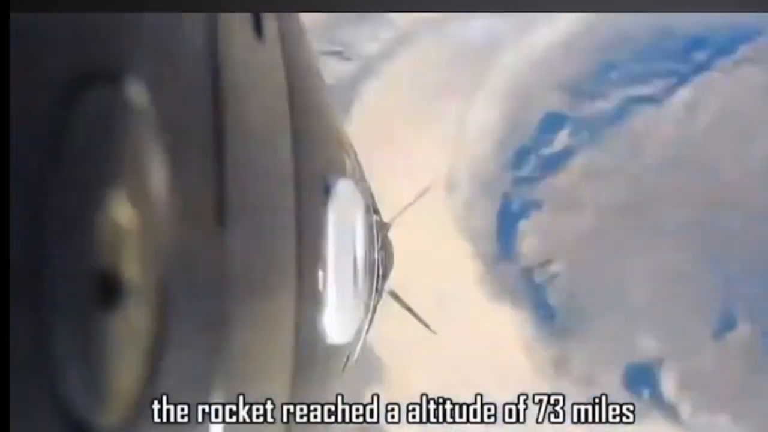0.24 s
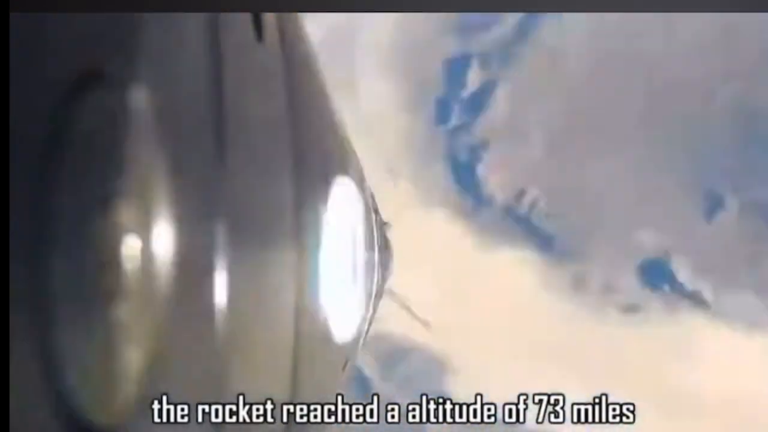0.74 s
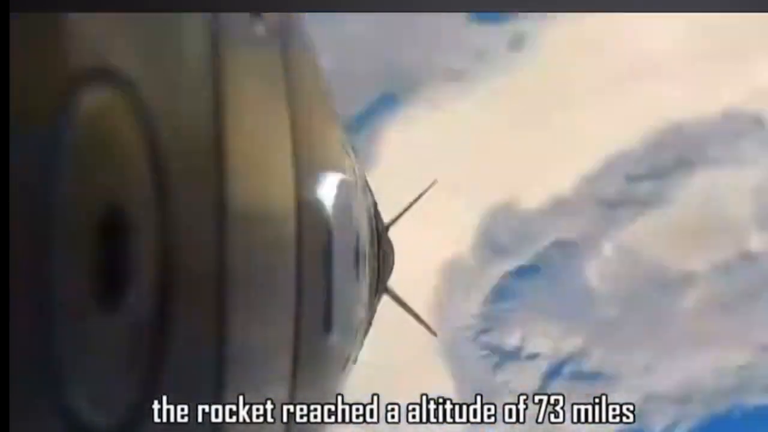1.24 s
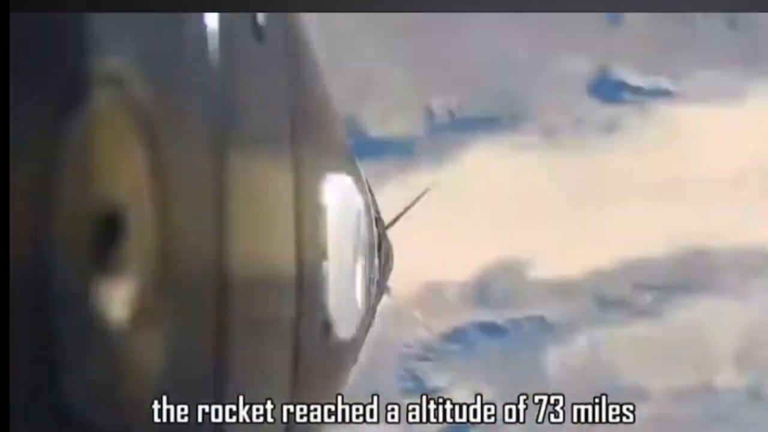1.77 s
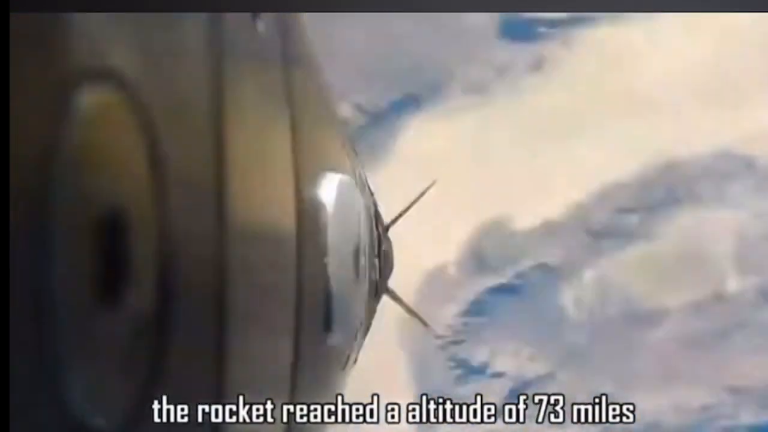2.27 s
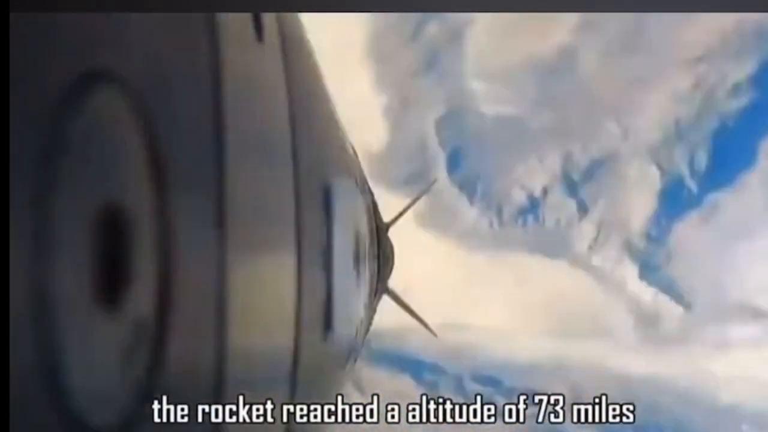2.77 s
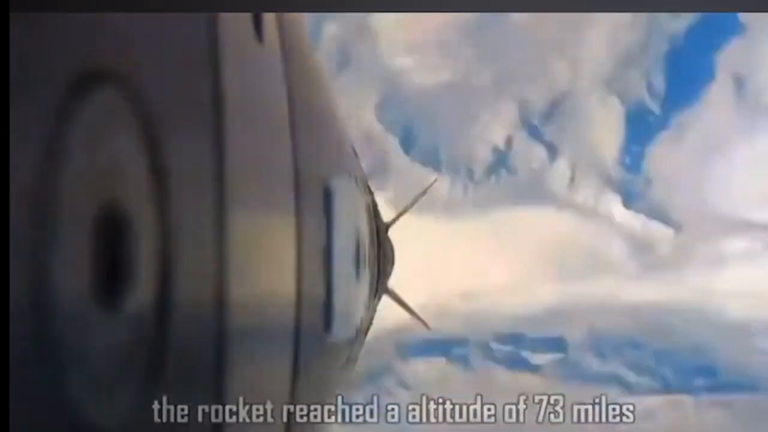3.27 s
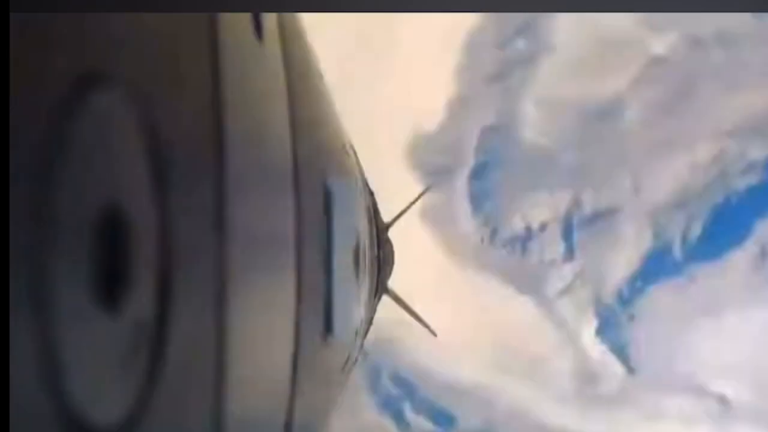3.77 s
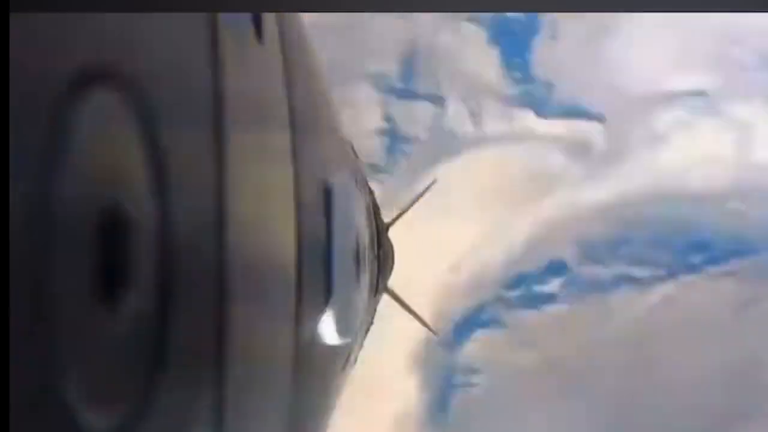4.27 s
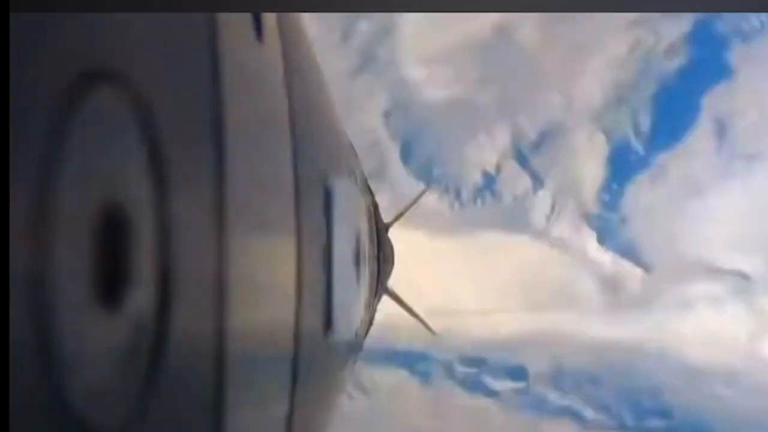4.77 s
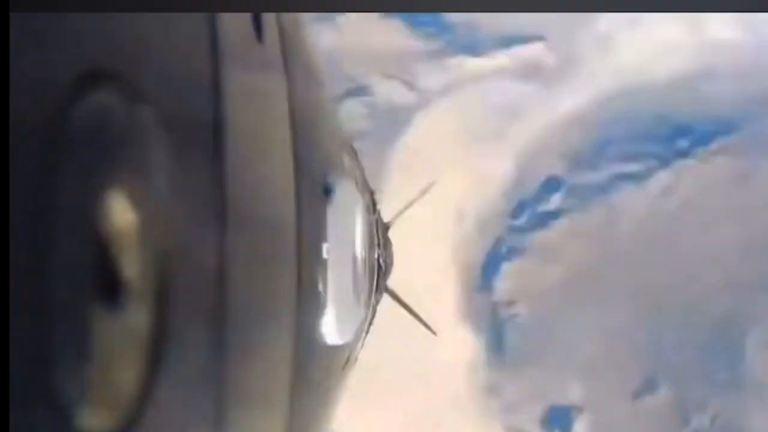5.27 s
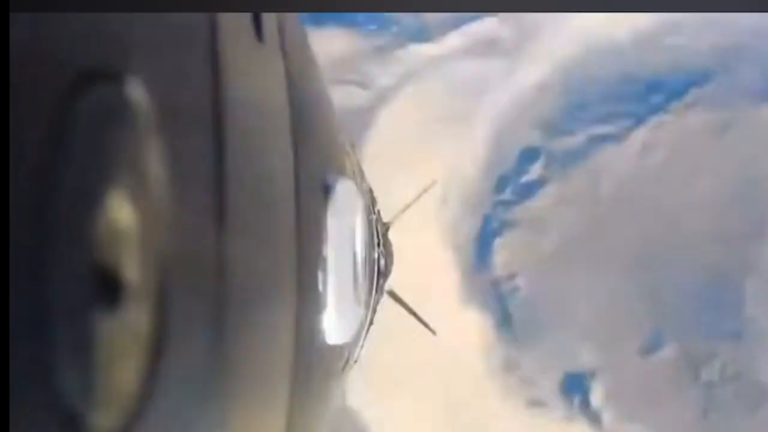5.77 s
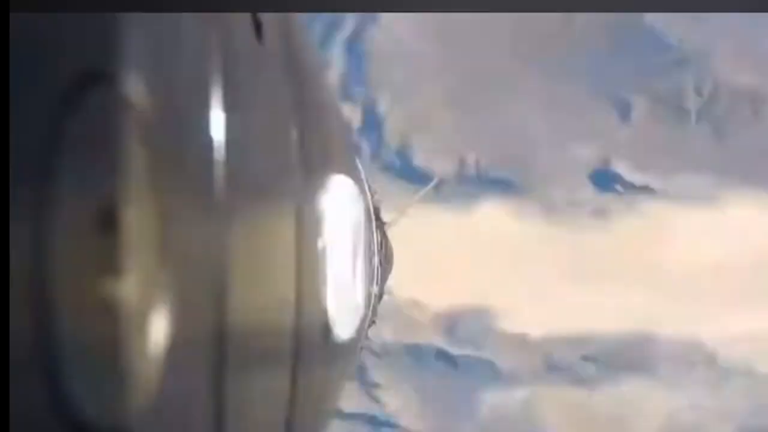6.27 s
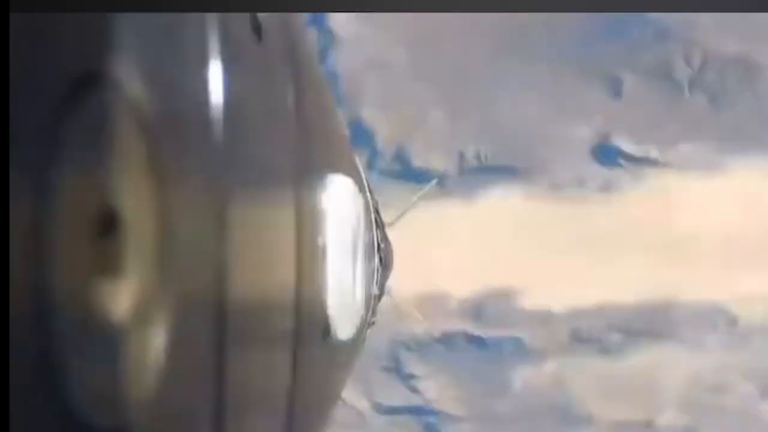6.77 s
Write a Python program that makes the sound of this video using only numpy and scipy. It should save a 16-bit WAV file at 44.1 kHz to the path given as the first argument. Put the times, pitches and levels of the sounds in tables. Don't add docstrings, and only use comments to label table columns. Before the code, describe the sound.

A camera fixed to a spinning rocket picks up vibration through the metal body: a steady, hollow, mid-low roar with dense fluttering knocks, a resonant plastic-like rush and thin hiss. Deep pressure rumble swells around three seconds. Everything gradually weakens as the air thins. Near the end a latch snaps twice in very quick succession, with a small thump and crack. Close, dry, crude sound with gritty mirrored treble and no echo.

```python
import sys
import numpy as np
from scipy import signal
from scipy.fft import rfft, irfft
from scipy.io import wavfile
from scipy.ndimage import uniform_filter1d

SR = 44100
rng = np.random.default_rng(int(sys.argv[2]) if len(sys.argv) > 2 else 0)


def volts_from_decibels(level):
    exponent = np.asarray(level, float) / 20
    return 10 ** exponent


def waveform_to_disk(signal):
    frames = np.transpose(np.atleast_2d(signal))
    scaled = np.clip(frames, -1, 1) * 32767
    samples = np.round(scaled).astype(np.int16)
    wavfile.write(sys.argv[1], SR, samples)


N = 310023

# f/Hz, width/Hz, level/dB
HULL_MODES = [(146.7, 17, -14), (168.8, 12, -16), (194.3, 28, -17), (248.8, 14.8, -6), (287.2, 19.2, -1.5),
              (315.7, 34, -5), (355.9, 16.2, -1.5), (395, 22, -5.5)]
# f/Hz, width/Hz, level/dB
PANEL_MODES = [(484, 56, -11.5), (505.2, 43, -5.5), (554, 62, -16), (588, 26, -12.5), (643.7, 51.6, -5),
               (689.5, 9.2, -3), (746, 79, -10.5), (842, 102, -20.5)]
# f/Hz, width/Hz, level/dB
HOUSING_MODES = [(1189, 98, -5.5), (1528, 63, -10), (1838, 66, -5), (1933, 146, -7), (2068, 91, -4.5),
                 (2233, 89, 0.5), (2544, 180, -5), (3075, 350, -11), (3180, 220, -25.5)]
# f/Hz, width/Hz, level/dB
SKIN_MODES = [(3015, 290, -3.5), (3290, 196, -4.5), (3816, 160, -4), (4153, 243, -0.5), (4380, 460, -4),
              (5310, 475, -1.5)]
# t/s, level over hull roar/dB, f/Hz
STRONG_GUSTS = [(0.026, 16, 315), (0.234, 19.5, 322), (0.3, 19.5, 350), (0.466, 14.5, 310),
                (0.561, 17.5, 353), (0.65, 17.5, 328), (0.784, 15.5, 340), (0.868, 22.5, 350),
                (1.037, 19.5, 339), (1.074, 21.5, 380), (1.193, 19.5, 306), (1.502, 16.5, 310),
                (1.55, 20, 344), (1.79, 20, 327), (2.093, 22, 347), (2.424, 18.5, 318), (2.694, 18.5, 282),
                (2.996, 15, 360), (3.475, 22.5, 330), (3.61, 18, 367), (3.913, 20, 350), (4.225, 22, 333),
                (4.393, 21.5, 308), (4.463, 13, 307), (4.55, 17.5, 294), (1.356, 18, 365),
                (5.004, 19.5, 280), (5.453, 24, 315), (6.637, 21.5, 306), (6.949, 17.5, 280)]
# t/s, gain/dB, half width/s
PRESSURE_SURGES = [
    (0.5, 1.5, 0.16),
    (1.35, 1.5, .2),
    (2.25, 3.5, 0.18),
    (3.15, 9, 0.2),
    (4.55, 4, 0.25),
    (5.64, 2, 0.11),
    (6.4, -1, 0.34),
]
# t/s, held/s, peak/dB, seating/0-1
LATCH_SNAPS = [
    (6.471, 0.027, -33, 0.03),
    (6.4987, 0.019, -29.5, 0.87),
]
# f/Hz, level/dB, t60 after release/s
LATCH_MODES = [(248, -10, 0.21), (280, 2, .03), (648, -10, .04), (796, -14, 0.0077), (1126, -24.5, 0.053),
               (1230, -22.5, 0.045), (2200, -22, .02)]
# f/Hz, level/dB, t60 before scaling/s
STRUCK_MODES = [(100, -20, 0.14), (166, -13.5, 0.12), (350, -14, 0.025), (383, -9.5, 0.061),
                (480, -11.5, 0.085), (550, -11, 0.024)]
# f/Hz, level/dB
TREBLE_STEP = [(9000, -25), (10100, -12), (10400, -3), (11200, -2.5), (12000, -5.5), (12800, -4),
               (13200, -3.5), (14500, 3)]
# until t/s, ceiling f/Hz
EARLY_CEILINGS = [
    (.7, 14280),
    (1.93, 13500),
]
# t/s, length/s, ceiling f/Hz
CEILING_LIFTS = [(.76, .09, 14300), (.92, .06, 14200), (1.12, .08, 14300), (1.24, .07, 14300),
                 (1.73, .05, 14100), (1.85, .04, 14400), (1.97, .3, 13200), (2.4, .12, 13400),
                 (2.6, .03, 14450), (2.75, .08, 13500), (2.92, .13, 13600), (3.03, .025, 14200),
                 (6.47, .03, 13600)]


def rms_one(x):
    return x / np.sqrt(np.mean(x ** 2) + 1e-20)


def drift(rate_hz):
    r = np.exp(-40 * np.pi * rate_hz / SR)
    coarse = rng.standard_normal(N // 20 + 2002)
    slow = signal.lfilter([1], [1, -2 * r, r * r], coarse)[2000:]
    return np.interp(np.arange(N) / 20, np.arange(len(slow)), rms_one(slow))


def resonate(x, f_hz, width_hz):
    r = np.exp(-np.pi * width_hz / SR)
    poles = [1, -2 * r * np.cos(2 * np.pi * f_hz / SR), r * r]
    return signal.lfilter(np.array([1, 0, -1]) * (1 - r * r) / 2, poles, x)


def ring(clicks, f_hz, t60_s):
    r = volts_from_decibels(-60 / (t60_s * SR))
    w = 2 * np.pi * f_hz / SR
    return signal.lfilter([0, np.sin(w)], [1, -2 * r * np.cos(w), r * r], clicks + 1e-18)


def fade(start_db, loss_db, time_s):
    return start_db - loss_db * (1 - np.exp(-np.arange(N) / SR / time_s))


def surges():
    t = np.arange(N) / SR
    return sum(db * np.exp(-((t - at_s) / width_s) ** 2) for at_s, db, width_s in PRESSURE_SURGES)


def rumble(surge_db):
    lumps = rng.standard_normal(N) * volts_from_decibels(2.2 * drift(13.0))
    low = signal.sosfilt(signal.butter(2, [12, 45], "band", fs=SR, output="sos"), lumps)
    low += volts_from_decibels(-3.0) * resonate(lumps, 58.0, 30)
    low += volts_from_decibels(-24.0) * resonate(lumps, 87, 40)
    return volts_from_decibels(fade(-54.5, 25, 8.6) + surge_db) * rms_one(low)


def latch():
    out, t = np.zeros(N), np.arange(8820) / SR
    thuds, cracks = np.zeros((2, N))
    swell = np.sin(np.pi / 2 * np.minimum(t / 0.003, 1)) ** 2
    for at_s, held_s, peak_db, seating in LATCH_SNAPS:
        overtone_db = 1.5 - 7.5 * seating
        body_db = -3 + 6.5 * seating
        at = round(at_s * SR)
        thuds[at] = volts_from_decibels(-68.5 + 25.5 * seating)
        cracks[at] = volts_from_decibels(-55 + 13 * seating)
        modes = []
        for f_hz, db, t60_s in LATCH_MODES:
            drive_s = held_s * min(1, (500 / f_hz) ** 1.66)
            modes.append((f_hz, db + overtone_db * (f_hz > 400), t60_s, drive_s))
        for f_hz, db, t60_s in STRUCK_MODES:
            modes.append((f_hz, db + body_db, 1.93 * t60_s, 0.005))
        for f_hz, level_db, t60_s, drive_s in modes:
            shape = swell * volts_from_decibels(-60 * np.maximum(t - drive_s, 0) / t60_s)
            tone = np.sin(2 * np.pi * (f_hz * t + 0.35 * rng.random()))
            out[at:at + len(t)] += volts_from_decibels(peak_db + level_db) * shape * tone
    crack_s = 0.0053
    dying = signal.lfilter([1], [1, -np.exp(-1 / (crack_s * SR))], cracks + 1e-18)
    crack = resonate(resonate(rng.standard_normal(N) * dying, 2070, 420), 2800, 3000)
    soft = signal.lfilter([0.02], [1, -0.98], thuds)
    return out + ring(soft, f_hz=59, t60_s=0.8) + 7.6 * crack


def shaken(modes, buffet_db, own_db, skirt):
    white, out = rng.standard_normal(N), np.zeros(N)
    for k, (f_hz, width_hz, level_db) in enumerate(modes):
        push = np.roll(white, 9001 * k) * volts_from_decibels(buffet_db + own_db * drift(9.0))
        out += volts_from_decibels(level_db) * resonate(resonate(push, f_hz, width_hz), f_hz, skirt * width_hz)
    return rms_one(out)


def skin(buffet):
    return volts_from_decibels(fade(-54.5, 35, 30.5)) * shaken(SKIN_MODES, 0.38 * buffet, own_db=0.98, skirt=7.2)


def housing(buffet, surge_db):
    level_db = fade(-47, 27.7, 6.58) + 0.12 * surge_db
    return volts_from_decibels(level_db) * shaken(HOUSING_MODES, 0.5 * buffet, own_db=1.3, skirt=14.7)


def hull(buffet, hull_db):
    t = np.arange(N) / SR
    roar = volts_from_decibels(hull_db) * shaken(HULL_MODES, 1.25 * buffet, own_db=0.62, skirt=3.8)
    panel_db = hull_db - 8.0 + 4.34 * np.exp(-t / 5.3) - 0.088 * t
    return roar + volts_from_decibels(panel_db) * shaken(PANEL_MODES, 0.82 * buffet, own_db=1.0, skirt=2.38)


def knocks(rows, swell_s, t60_s):
    out, t = np.zeros(N + 4410), np.arange(4410) / SR
    shape = (1 - np.exp(-t / swell_s)) ** 2 * volts_from_decibels(-60 * t / t60_s)
    shape /= shape.max()
    for (at_s, peak_db, f_hz), (phase, colour) in zip(rows, rng.random((len(rows), 2))):
        tone = np.sin(2 * np.pi * (f_hz * t + phase))
        tone += 0.2 * np.sin(2 * np.pi * (1.21 * f_hz * t + colour))
        tone += 0.29 * colour * np.sin(2 * np.pi * (2.0 * f_hz * t + colour))
        at = round(at_s * SR)
        out[at:at + len(t)] += volts_from_decibels(peak_db - 7.0) * tone * shape
    return out[:N]


def gusts(hull_db, weak_count):
    at_s = rng.uniform(0, N / SR - 0.01, weak_count)
    spread = rng.standard_normal((weak_count, 2))
    weak = np.c_[at_s, 14.5 + 1.5 * spread[:, 0], 315 + 32 * spread[:, 1]]
    rows = [(s, db + hull_db[int(s * SR)], f_hz) for s, db, f_hz in [*STRONG_GUSTS, *weak]]
    return knocks(rows, swell_s=0.0011, t60_s=0.043)


def scene():
    surge_db = surges()
    hull_db = fade(-37, 22.14, 6.76) + 0.098 * surge_db
    buffet = 0.57 * drift(52.0) + 0.48 * drift(3.2)
    mix = rumble(surge_db) + latch()
    mix += skin(buffet) + housing(buffet, surge_db)
    mix += hull(buffet, hull_db) + gusts(hull_db, weak_count=30)
    return mix[None]


def sample_and_hold(x, rate_hz):
    x = signal.sosfilt(signal.butter(8, 5750, fs=SR, output="sos"), x)
    sampled = x * (1 + 2 * np.cos(2 * np.pi * rate_hz * np.arange(N) / SR))
    droop = np.sinc(np.fft.rfftfreq(N, 1 / SR) / rate_hz)
    return irfft(rfft(sampled) * droop, N)


def converter_noise(x):
    level = np.sqrt(uniform_filter1d(x ** 2, size=44100))
    return volts_from_decibels(-33) * level * rng.standard_normal(N)


def thin_treble(x, size=1024):
    n, k = np.arange(2 * size), np.arange(420, size)
    basis = np.sqrt(2 / size) * np.sin(np.pi * (n + 0.5) / (2 * size))
    basis = basis * np.cos(np.pi / size * np.outer(k + 0.5, n + 0.5 + size / 2))
    padded = np.pad(x, (size, 2 * size))
    starts = np.arange(0, N + size, size)
    lines = padded[starts[:, None] + n] @ basis.T
    f_hz, t_s = (k + 0.5) * SR / (2 * size), starts / SR

    lowest_ceiling_hz = 12900
    treble = np.sqrt(np.mean(lines[:, f_hz < lowest_ceiling_hz] ** 2, axis=1) + 1e-18)
    wander_db = uniform_filter1d(rng.normal(0, 2.5, len(t_s)), size=3)
    treble = uniform_filter1d(treble, size=5) * volts_from_decibels(wander_db)
    step = np.outer(treble, volts_from_decibels(np.interp(f_hz, *np.transpose(TREBLE_STEP))))

    ceiling_hz = np.full(len(t_s), float(lowest_ceiling_hz))
    early = [(0, until_s, top_hz) for until_s, top_hz in EARLY_CEILINGS]
    for start_s, length_s, top_hz in early + list(CEILING_LIFTS):
        lifted = (t_s >= start_s) & (t_s <= start_s + length_s)
        ceiling_hz = np.where(lifted, np.maximum(ceiling_hz, top_hz), ceiling_hz)
    ceiling_hz += rng.normal(0, 80, len(t_s))

    kept = step * np.trunc(lines / step + 0.46 * np.sign(lines)) * (f_hz < ceiling_hz[:, None])
    np.add.at(padded, starts[:, None] + n, (kept - lines) @ basis)
    return padded[size:size + N]


def low_pass(x):
    return signal.sosfilt(signal.butter(12, 14940, fs=SR, output="sos"), x)


def record(dry):
    held = sample_and_hold(dry[0], rate_hz=12000)
    held += converter_noise(held)
    return low_pass(thin_treble(held)[None])


dry = scene()
out = record(dry)
waveform_to_disk(out)
```